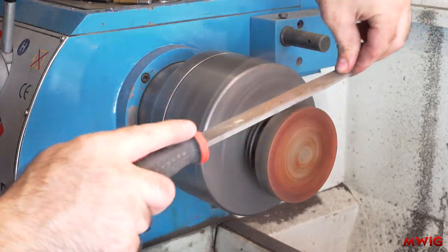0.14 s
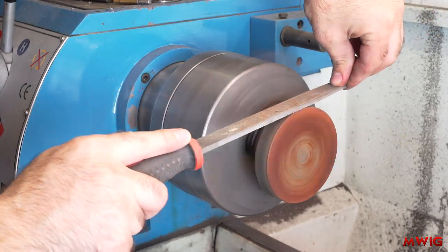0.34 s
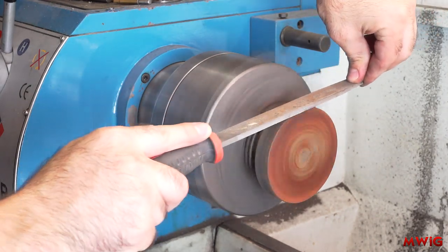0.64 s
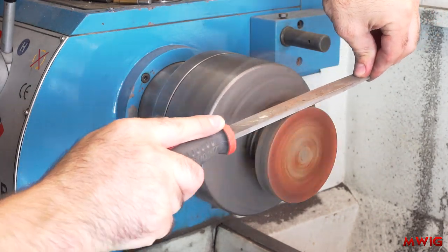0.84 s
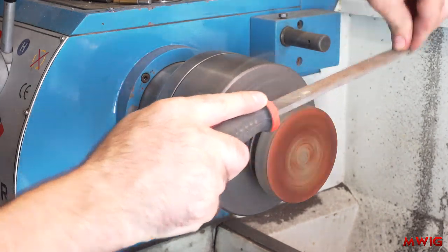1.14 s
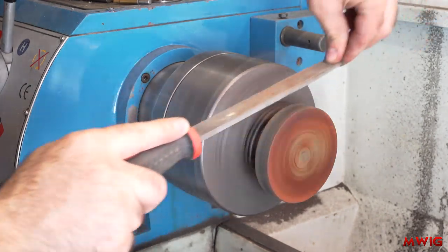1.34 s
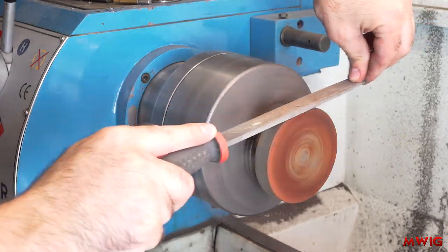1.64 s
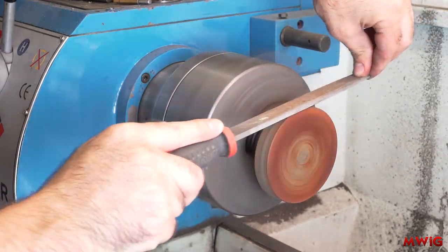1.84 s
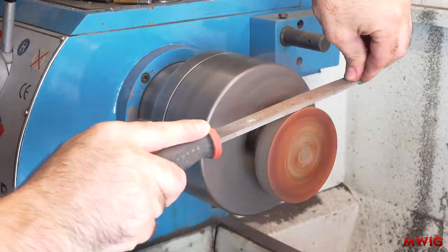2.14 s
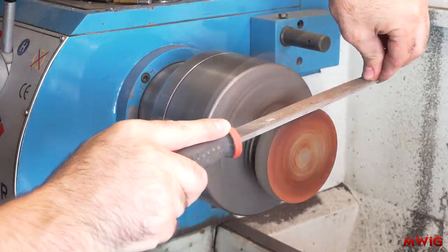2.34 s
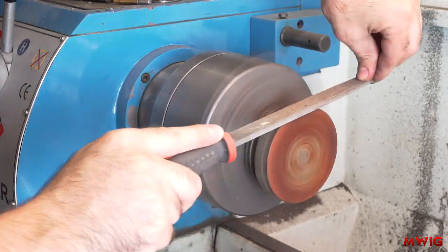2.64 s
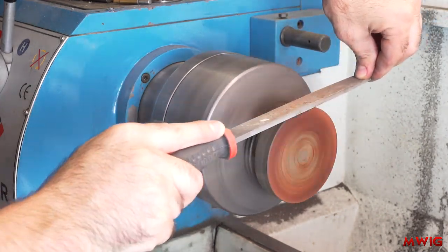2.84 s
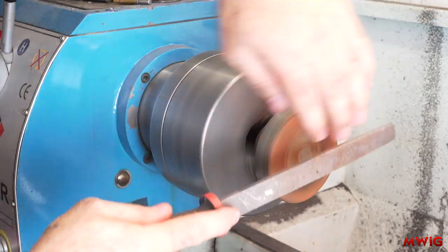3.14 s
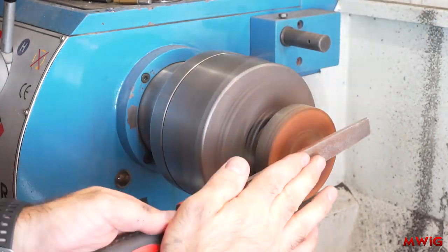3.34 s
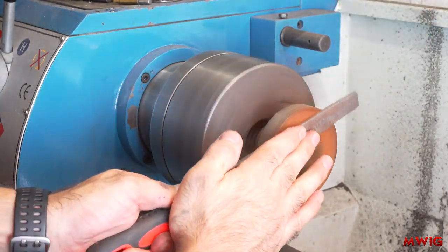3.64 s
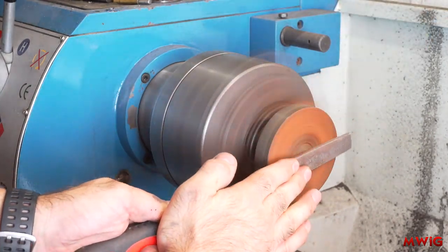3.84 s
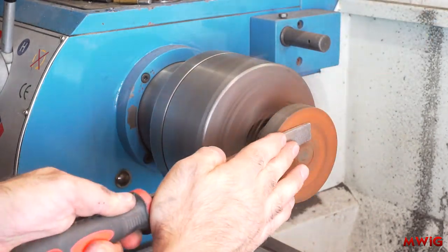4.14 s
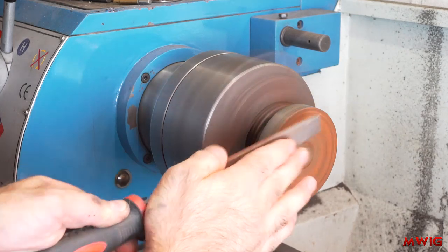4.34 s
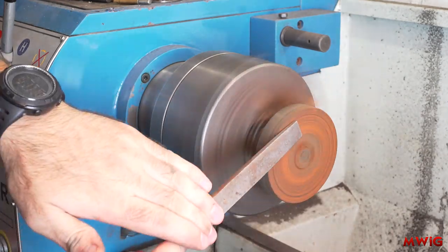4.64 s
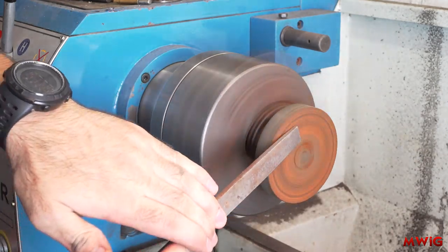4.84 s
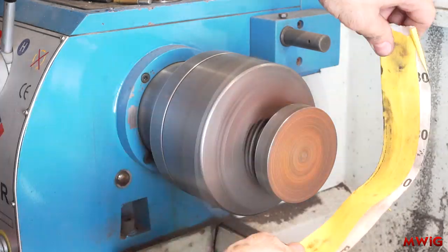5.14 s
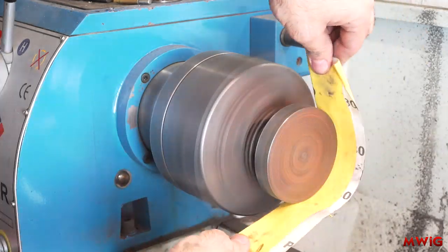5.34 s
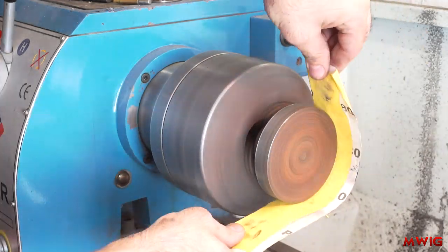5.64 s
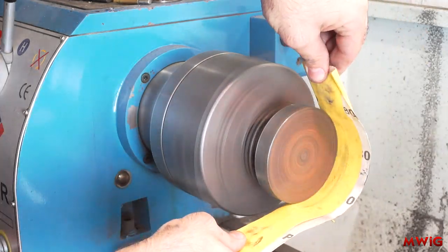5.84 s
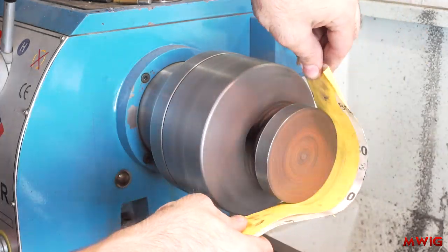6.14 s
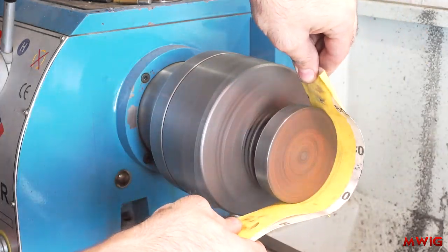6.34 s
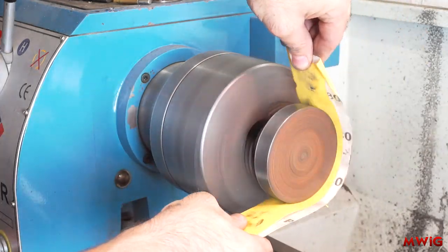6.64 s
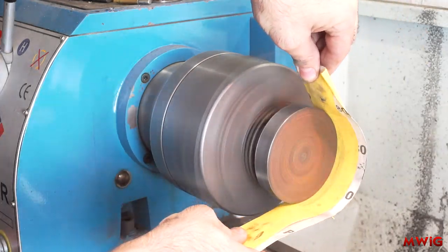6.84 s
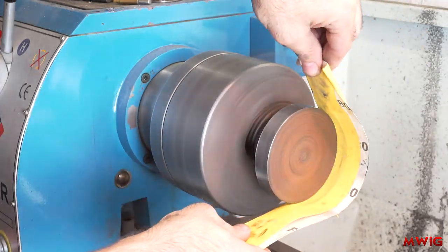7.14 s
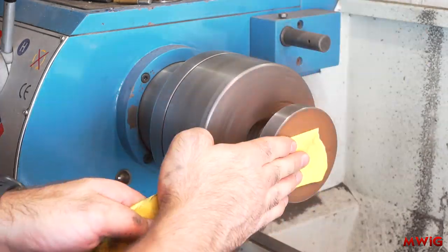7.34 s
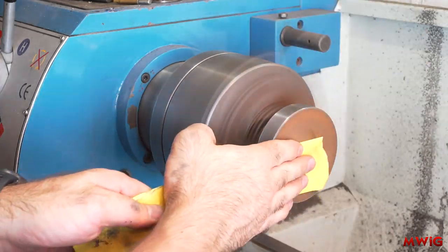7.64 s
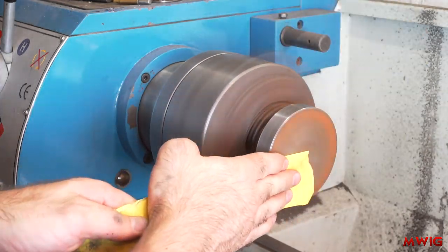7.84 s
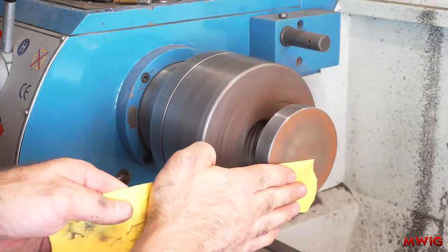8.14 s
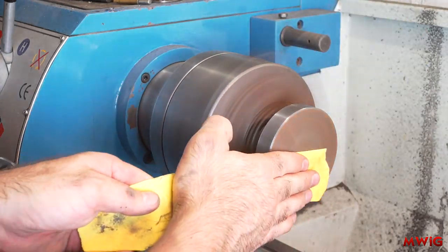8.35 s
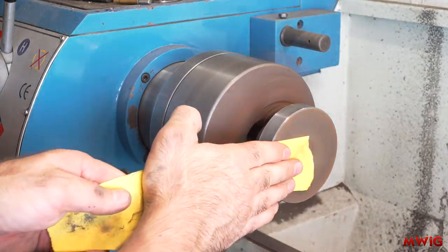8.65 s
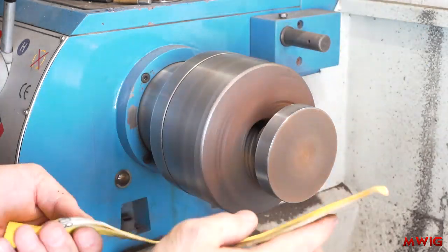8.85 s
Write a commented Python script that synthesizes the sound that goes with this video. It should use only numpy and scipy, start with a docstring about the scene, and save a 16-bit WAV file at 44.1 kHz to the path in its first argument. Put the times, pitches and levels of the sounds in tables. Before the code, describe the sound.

A lathe's rattling gear hum abruptly becomes a high, hissing whine, with stretches of filing and sanding on top.

```python
"""Geared lathe, then six times as fast

A metal lathe runs in a workshop: meshing teeth give a tone, and their impacts ring the casing as a rattle. A
hand file takes one stroke over the spinning disc, exciting the modes of its blade. After 1.5 s every frequency
of the machine jumps sixfold, so the gear hum becomes a high whine and the rattle a hiss. File and abrasive
cloth then rub on the disc and load the gears, among a few soft handling bumps."""
import sys
import numpy as np
from scipy import signal
from scipy.fft import rfft, irfft
from scipy.io import wavfile
from scipy.ndimage import map_coordinates

SR = 44100
rng = np.random.default_rng(int(sys.argv[2]) if len(sys.argv) > 2 else 0)


def wav_record(signal):
    """Record a signal, one row per channel, as 16-bit PCM in the file named by sys.argv[1]."""
    frames = np.transpose(np.atleast_2d(signal))
    bounded = np.clip(frames, -1, 1)
    # unit amplitude maps onto the largest positive 16-bit level
    quanta = np.round(bounded * 32767).astype(np.int16)
    wavfile.write(sys.argv[1], SR, quanta)


N = 396900
T, HZ = np.arange(N) / SR, np.arange(N // 2 + 1) * SR / N

JUMP_S, SPEEDUP = 1.508, 6
TEETH, SPINDLE_RATIO = 24, 1 / 5  # per turn of the gearbox shaft: teeth meshed, spindle turns
PRESS_RAMP_S, FILE_RAMP_S = 0.12, 0.04  # the hands ease on and off; the file bites and lifts

# Gearbox shaft speed before the speed-up, creeping upward and sagging under the tools: time_s, shaft_hz
SHAFT_SPEED = [(0, 21.333), (0.35, 21.389), (0.9, 21.327), (1.4, 21.431), (1.62, 21.389), (1.9, 21.445),
               (2.25, 21.428), (2.6, 21.481), (2.85, 21.449), (3.3, 21.535), (3.7, 21.504), (4.3, 21.508),
               (5.3, 21.522), (6.6, 21.499), (7.4, 21.553), (8.1, 21.54), (9, 21.552)]
START_SHAFT_HZ = SHAFT_SPEED[0][1]
# Stereo width and balance of the rattle at normal speed, nearly mono in the lows and wider above:
# frequency_hz, side_minus_mid_db, left_minus_right_db
STEREO_IMAGE = [(30, -11, 0), (208, -50, 0.25), (386, -22, 0), (770, -4.5, -1.5), (1280, -5, -1.5),
                (2380, -4.5, -3.5), (9000, 0, -1)]
# File, then cloth, pressed on the disc; each grip loads the gears differently:
# start_s, end_s, rubbing_db, mesh_change_db, octave_change_db, rattle_change_db
TOOL_PRESSES = [(1.5, 3.1, -72, -0.5, 0.1, -0.33), (3.42, 4.38, -60.5, -5, -1, -.5),
                (4.55, 5.07, -57, -0.5, 0.5, -0.4), (5.7, 7.222, -70, 1, 0.7, 0),
                (7.37, 8.68, -57, -1.5, 3.1, -0.5)]


def amp(db):
    """Amplitude ratio for a level in decibels."""
    return 10 ** (np.asarray(db) / 20)


def spectra(table, hz):
    """The columns of a table, interpolated over log frequency."""
    table_hz, *columns = np.transpose(table)
    return [np.interp(np.log(hz + 1e-3), np.log(table_hz), column) for column in columns]


def unit(x):
    """Normalisation to rms 1."""
    return x / np.sqrt(np.mean(x ** 2))


def shape(x, gain):
    """Filtering as multiplication of the spectrum by a gain."""
    return irfft(rfft(x) * gain, N)


def band(centre_hz, half_width_hz, power=2):
    """Band-pass gain; a higher power steepens the skirts."""
    return 1 / (1 + ((HZ - centre_hz) / half_width_hz) ** power)


def noise(gain):
    """Filtered Gaussian noise of rms 1."""
    return unit(shape(rng.standard_normal(N), gain))


def drift(rate_hz):
    """Slow random fluctuation: low-passed noise of rms 1."""
    return noise(np.exp(-(HZ / rate_hz) ** 2))


def ring(hz, half_width_hz):
    """A resonance sustained by random excitation."""
    return noise(band(hz, half_width_hz) ** (2 / 3))


def grit(spread_db):
    """Dense tiny impacts of uneven strength, merging into white noise."""
    return unit(rng.standard_normal(N) * amp(spread_db * np.minimum(rng.exponential(size=N), 4)))


def tone(cycles, db):
    """A sinusoid of the given rms level."""
    return np.sqrt(2) * amp(db) * np.sin(2 * np.pi * cycles)


def held(start_s, end_s, ramp_s):
    """Trapezoidal envelope, at half height at its start and end times."""
    return np.clip(np.minimum(T - start_s, end_s - T) / ramp_s + 0.5, 0, 1)


def pan(db):
    """Channel gains for a left-minus-right level difference."""
    gains = amp(np.array([[1], [-1]]) * db / 2)
    return gains / gains.mean(axis=0)


def widen(mid, side):
    """Left and right as the sum and difference of mid and side."""
    return np.array([mid + side, mid - side])


def motor_hum(speedup, mains_hz=49.8):
    """The motor vibrates at twice the mains frequency, here multiplied by the speed-up."""
    return tone(2 * mains_hz * np.cumsum(speedup) / SR, -82.5)


def handling_bumps(relative_half_width=0.16, gain_db=-4):
    """Damped vibration: tools put down and picked up give dull thuds that decay exponentially."""
    # Soft impacts: start_s, relative_level_db, centre_hz, t60_s
    impacts = [(3.488, -84, 175, .2), (5.202, -76, 230, 0.074), (7.162, -78, 215, .15),
               (7.274, -65, 212, 0.15), (7.339, -84, 150, .1), (8.014, -81, 245, 0.34),
               (8.18, -80, 250, .3), (8.29, -82, 190, .25), (8.67, -80, 200, 0.22), (8.8, -78, 199, .15)]
    out = 0
    for start_s, db, hz, t60_s in impacts:
        age = np.maximum(T - start_s, 0)
        body = noise(band(hz, relative_half_width * hz))
        soft_contact = 1 - np.exp(-age / 0.003)
        decay = np.exp(-np.log(1000) * age / t60_s)
        out = out + amp(db + gain_db) * body * soft_contact * decay
    return out


def file_tip_sizzle(hz=15000, half_width_hz=450, level_db=-64):
    """Friction of the file edge on the rim of the disc briefly excites a very high resonance of the file tip."""
    force = amp(level_db) * held(start_s=4.6, end_s=5.04, ramp_s=FILE_RAMP_S)
    return pan(-1) * force * widen(ring(hz, half_width_hz), amp(-12) * ring(hz, half_width_hz))


def abrasive_rubbing():
    """Friction noise: abrasive grains strike the spinning disc and hiss while the hands press."""
    # Spectrum of the friction: frequency_hz, relative_level_db
    friction_spectrum = [(300, -65), (1500, -34), (4000, -7.5), (7000, 8), (10000, -0.5), (12000, -2.5),
                         (15000, 0)]
    colour = amp(spectra(friction_spectrum, HZ)[0])
    force = sum(amp(db) * held(start, end, PRESS_RAMP_S) for start, end, db, *_ in TOOL_PRESSES)
    mid, side = (unit(shape(grit(spread_db=5.5), colour)) for _ in range(2))
    return pan(-2.5) * force * widen(mid, amp(-6) * side) * (T >= JUMP_S)


def file_stroke(start_s=0.334, end_s=1.138, start_db=-60, lean_db_per_s=3, uneven_db=2.0):
    """Modal excitation: file teeth rasp on the disc, and the sliding contact wakes mode after mode."""
    # Modes of the file blade: frequency_hz, half_width_hz, relative_level_db
    blade_modes = [(7500, 250, 10), (8140, 330, -1.5), (9150, 190, -3.5), (9700, 160, -4),
                   (10730, 140, -3.5)]
    force = held(start_s, end_s, FILE_RAMP_S) * amp(start_db + lean_db_per_s * (T - start_s))
    # The contact favours high modes at either end of the stroke, lower ones around a turning point.
    end_hz, turn_hz, reach_hz = 10750, 8450, 800
    turn_s, approach_s, leave_s = 0.88, 0.27, 0.1
    near_turn = np.exp(-np.abs(T - turn_s) / np.where(T < turn_s, approach_s, leave_s))
    favoured_hz = end_hz + (turn_hz - end_hz) * near_turn
    top_mode_db = -6 - 30 * np.abs(T - 0.82)  # the highest mode is strongest in mid stroke
    bite = amp(uneven_db / 2 * drift(rate_hz=25))
    shares = [amp(db + uneven_db * drift(rate_hz=16)) / (1 + ((hz - favoured_hz) / reach_hz) ** 2)
              for hz, _, db in blade_modes]
    contacts = []
    for _ in range(2):
        rasp = unit(shape(grit(spread_db=5), band(9000, 4000, power=4)))
        blade = sum(share * ring(hz, width) for share, (hz, width, _) in zip(shares, blade_modes))
        top_mode = amp(top_mode_db) * ring(hz=13900, half_width_hz=220)
        contacts.append(force * unit(bite * rasp + blade + top_mode))
    mid, side = contacts
    shudder = force * amp(-23) * noise(band(80, 28, power=4))  # the work shakes under the file
    return pan(-2.2) * widen(mid, amp(-4.5) * side) + shudder


def shaft_lines(turns, waver_db=2.5, pan_scatter=1.5):
    """Rotational orders: uneven teeth and bearings radiate weak tones at multiples of the shaft speed."""
    # Whole orders from uneven teeth: shaft_multiple, level_db
    tooth_errors = [(3, -97.1), (14, -70.9), (15, -70.4), (17, -72.7), (19, -73.4), (23, -66.7),
                    (27, -72.3), (29, -74.7), (31, -67.9), (33, -71.9), (35, -74.2), (36, -74.9),
                    (37, -64.1), (38, -74.6), (39, -73.6), (42, -69.9), (43, -73.2), (51, -74.1),
                    (57, -72.3), (74, -73.5)]
    # Fractional orders from bearings and the other gear pairs: shaft_multiple, level_db
    bearing_orders = [(6.62, -81), (8.59, -78), (9.28, -81.5), (15.19, -73), (19.5, -73.5), (20.44, -67),
                      (20.69, -71), (38.34, -69.5), (69.38, -79), (74.69, -77.5), (103.44, -77.5)]
    out = 0
    for multiple, db in tooth_errors + bearing_orders:
        waver = np.interp(T, np.linspace(0, T[-1], 60), rng.standard_normal(60))
        _, balance_db = spectra(STEREO_IMAGE, multiple * START_SHAFT_HZ)
        pan_db = balance_db * (1 + pan_scatter * rng.standard_normal())
        out = out + pan(pan_db) * tone(multiple * turns + rng.random(), db + waver_db * waver)
    return out


def gear_rattle(turns, speedup, ripple, repeat_db=-18, throb_depth=0.036):
    """Impact noise: teeth and rollers knock densely and ring the casing, giving a peaked spectrum."""
    # Spectral density of the rattle at normal speed: frequency_hz, density_db
    rattle_spectrum = [(8.0, -118.9), (17.0, -116.9), (50.0, -112.3), (80.0, -112.6), (150.0, -92),
                       (260.0, -92), (380.0, -83), (560.0, -84), (1100.0, -84.5), (1900.0, -84),
                       (2400.0, -82), (5000.0, -93), (9000.0, -105.1), (15000.0, -123.2)]
    # Peaks in the rattle at normal speed, including noisy bands around the gear tone and its octave:
    # centre_hz, width_hz, lift_db
    rattle_peaks = [(67, 3.4, -1.5), (78.7, 5.7, 17.5), (90.4, 10.5, 15.5), (142, 2.1, -3.5), (179, 13, 7),
                    (213, 6.2, 3.5), (252, 3.7, 6.5), (274.7, 13, 5.5), (300.8, 8.6, 9.5),
                    (331.4, 7.5, 7.5), (371.7, 23.5, 4.5), (395.3, 4.9, 9), (420.3, 6.6, 6.5),
                    (443.3, 8.7, 13), (499, 4.3, 12), (524, 22, 8.5), (581, 4.9, 6.5), (615, 7.4, 4.5),
                    (640, 10, 3.5), (668.4, 10, 6), (777, 21, 4), (800, 10, 3.5), (810, 6.4, 2),
                    (930, 48, 6), (1021.7, 18, 10.5), (1120, 43, 7.5), (1245, 28, 4), (1543, 39, 8.5),
                    (1613, 14, 4.5), (2230, 9.1, 9.5), (2290, 12, 2), (2390, 37, 1.5), (2640, 180, -5)]
    hz = HZ / speedup
    db = spectra(rattle_spectrum, hz)[0] + np.interp(hz, *ripple)
    db -= 10 * np.log10(speedup)  # the same power spreads over a wider band
    for centre_hz, width_hz, lift_db in rattle_peaks:
        db += lift_db / (1 + (2 * (hz - centre_hz) / width_hz) ** 2)
    # Part of the knocking repeats with every turn of the shaft.
    one_turn = rng.standard_normal(int(SR / START_SHAFT_HZ / speedup))
    repeating = map_coordinates(one_turn, [turns % 1 * len(one_turn)], order=3, mode="grid-wrap")
    throb = 1 + throb_depth * np.sin(2 * np.pi * SPINDLE_RATIO * turns)
    knocks = throb * (grit(spread_db=2.0) + amp(repeat_db) * repeating)
    side_db, pan_db = spectra(STEREO_IMAGE, hz)
    side = shape(rng.standard_normal(N), amp(side_db))
    return shape(widen(knocks, side), amp(db) * np.sqrt(SR / 2) * pan(pan_db))


def gear_levels(shaft_hz, octave_fall_db_per_hz=40):
    """Load and speed set the levels of the mesh tone and its octave, and the gains of rattle and beats."""
    # Slow swells of the mesh tone and beats at normal speed: time_s, half_width_s, lift_db
    surges = [(.2, 0.11, 5), (.54, 0.13, 9), (1.27, 0.22, 9)]
    surge_db = sum(db * np.exp(-((T - time_s) / width_s) ** 2) for time_s, width_s, db in surges)
    mesh_change, octave_change, rattle_change = sum(
        np.outer(changes_db, held(start, end, PRESS_RAMP_S))
        for start, end, _, *changes_db in TOOL_PRESSES)
    rattle_gain_db = -0.15 + rattle_change
    mesh_db = np.where(T >= JUMP_S, -55.5 + mesh_change, -66.5 + surge_db)
    beat_gain_db = np.where(T >= JUMP_S, -0.6 + 0.15 * mesh_change, -2 + surge_db)
    # The octave starts on a casing resonance and slides off it as the shaft creeps faster.
    octave_db = -50 - octave_fall_db_per_hz * (shaft_hz - START_SHAFT_HZ) + octave_change
    return rattle_gain_db, mesh_db, octave_db, beat_gain_db


def gear_whine(turns, mesh_db, octave_db, beat_gain_db, runout_cycles=0.0315, sway_cycles=0.0215):
    """Phase modulation: off-centre wheels make the teeth mesh early and late, so the whine warbles."""
    # Tones of other wheels beating against the whine: offset_shaft_multiple, level_db
    sidebands = [(-.264, -65), (.2, -69), (.34, -70.5)]
    mesh_cycles = TEETH * turns
    spindle_angle = 2 * np.pi * SPINDLE_RATIO * turns
    warbled = mesh_cycles + runout_cycles * np.sin(spindle_angle) + sway_cycles * np.sin(np.pi * turns)
    tooth_load = 1 + 0.2 * np.cos(spindle_angle)  # the teeth bear harder once a spindle turn
    fundamental = tooth_load * tone(warbled, mesh_db)
    beats = sum(tone(mesh_cycles + offset * turns, db + beat_gain_db) for offset, db in sidebands)
    octave = tone(2 * warbled, octave_db)
    third = tone(3 * warbled, octave_db - 14)
    return pan(-8.0) * fundamental + pan(-0.95) * beats + pan(-1.5) * octave + pan(-3.5) * third


def scene():
    """Superposition of the hand tools and the machine, first at normal speed, then six times as fast."""
    fast = T >= JUMP_S
    speedup = np.where(fast, SPEEDUP, 1)
    hunting = 0.01805 * drift(rate_hz=5.05) * fast  # the drive wanders around its speed
    shaft_hz = np.interp(T, *np.transpose(SHAFT_SPEED)) + hunting  # before the speed-up
    turns = np.cumsum(shaft_hz * speedup) / SR
    rattle_gain_db, mesh_db, octave_db, beat_gain_db = gear_levels(shaft_hz)
    # Countless small panel and room resonances ripple the spectrum: frequency_hz, lift_db
    ripple = np.arange(0, 2800, 7), 1.6 * rng.standard_normal(400)
    rattle = np.where(fast, gear_rattle(turns, SPEEDUP, ripple), gear_rattle(turns, 1, ripple))
    whine = gear_whine(turns, mesh_db, octave_db, beat_gain_db)
    machine = amp(rattle_gain_db) * rattle + whine + shaft_lines(turns) + motor_hum(speedup)
    return machine + file_stroke() + abrasive_rubbing() + file_tip_sizzle() + handling_bumps()


def record(dry):
    """Band limiting: a steep elliptic low-pass removes the treble above 15.7 kHz."""
    return signal.sosfilt(signal.ellip(12, 0.1, 80, 15700, fs=SR, output="sos"), dry)


dry = scene()
out = record(dry)
wav_record(out)
```